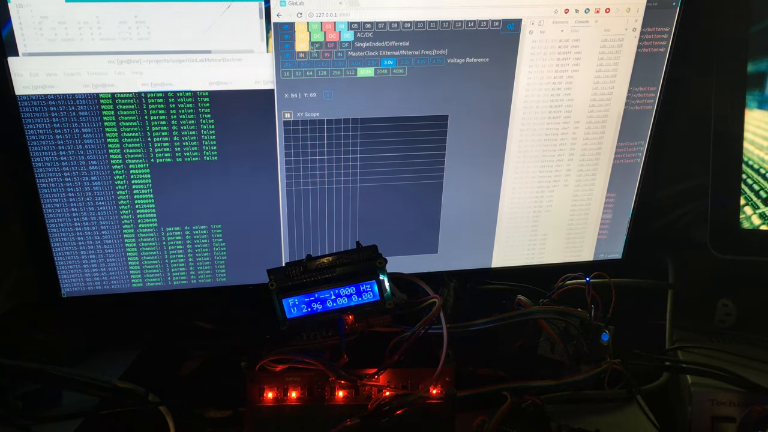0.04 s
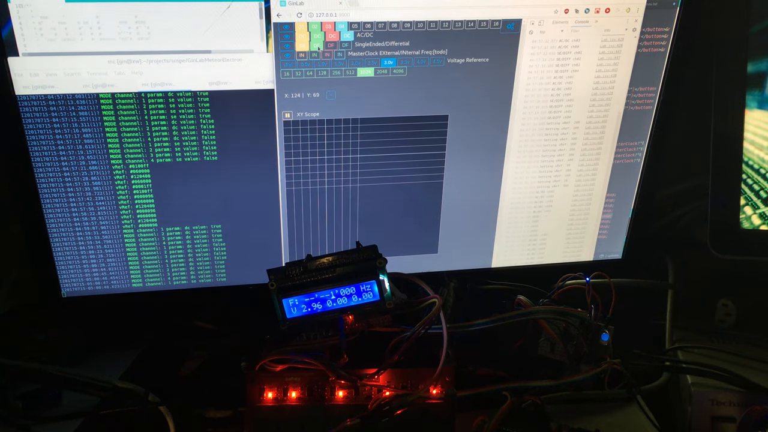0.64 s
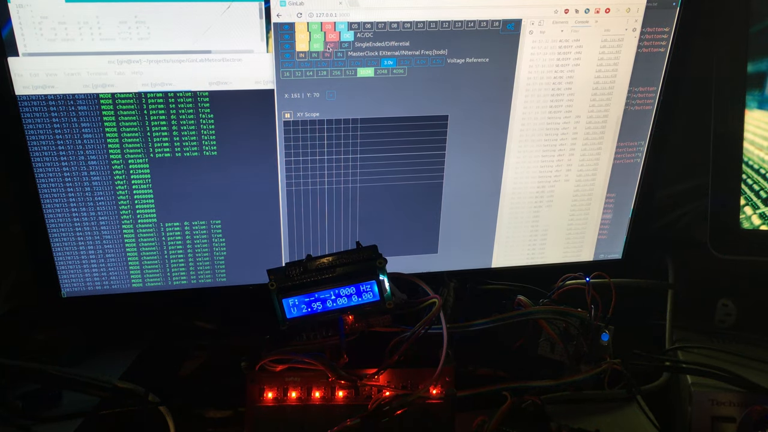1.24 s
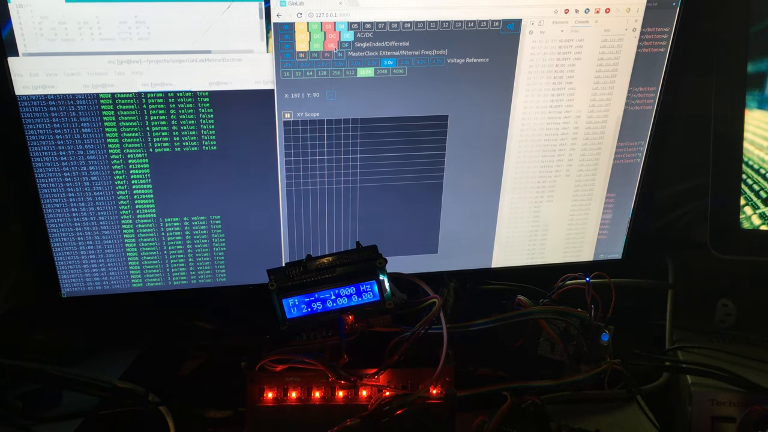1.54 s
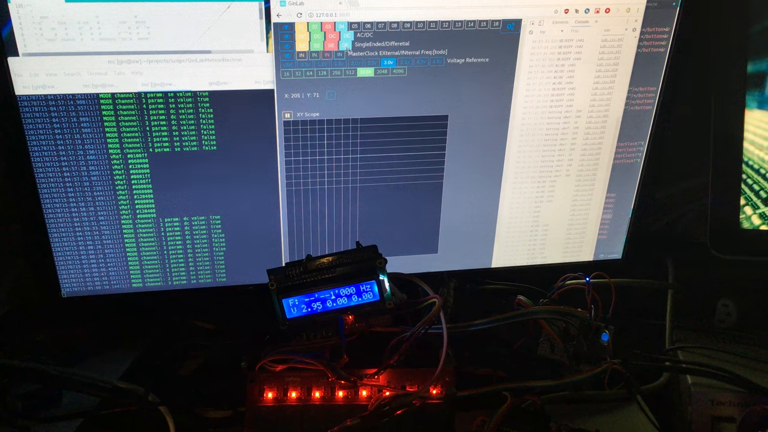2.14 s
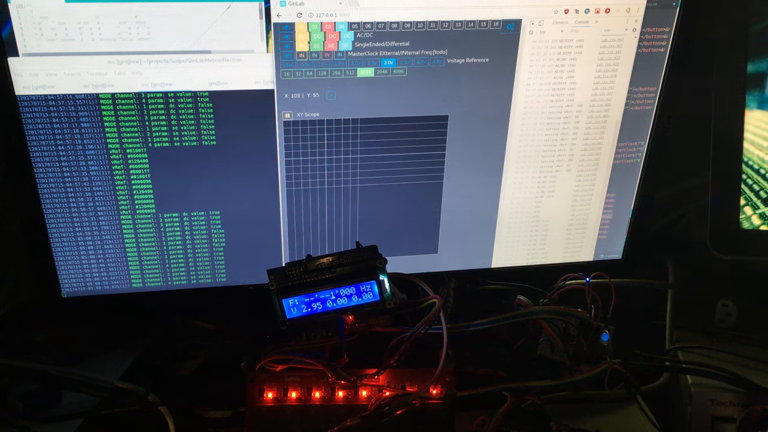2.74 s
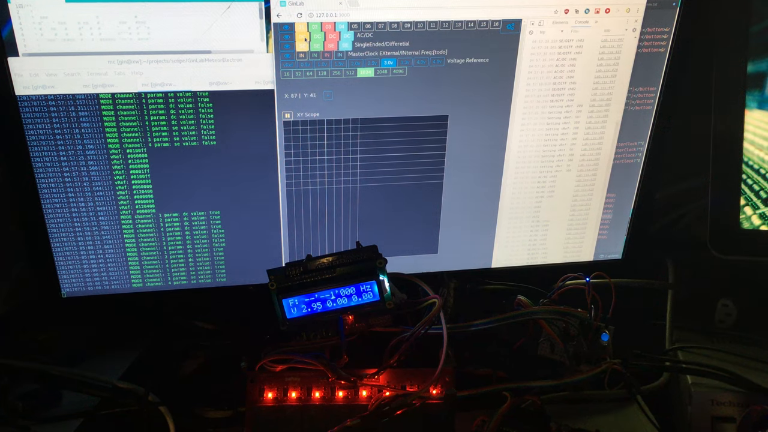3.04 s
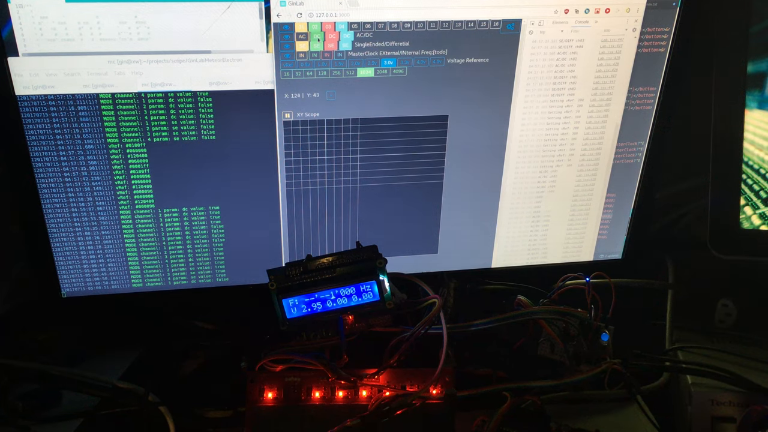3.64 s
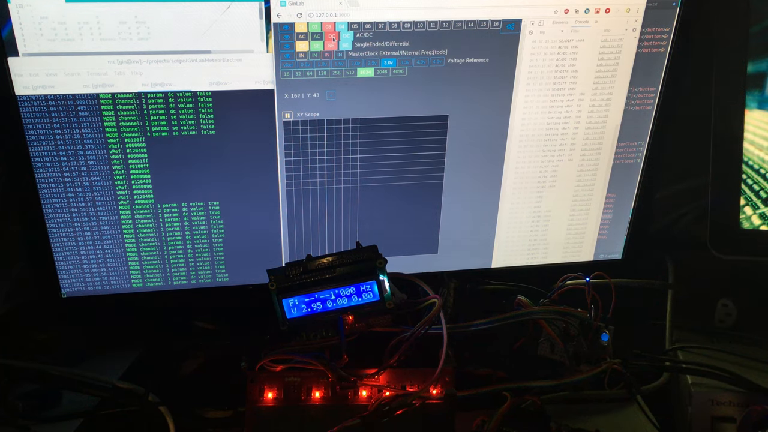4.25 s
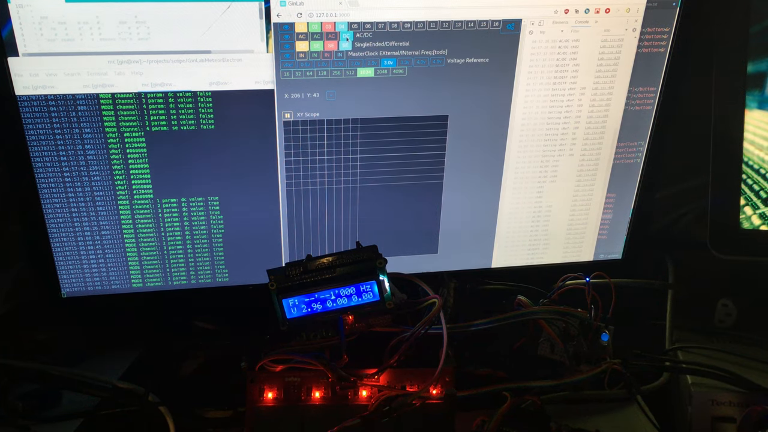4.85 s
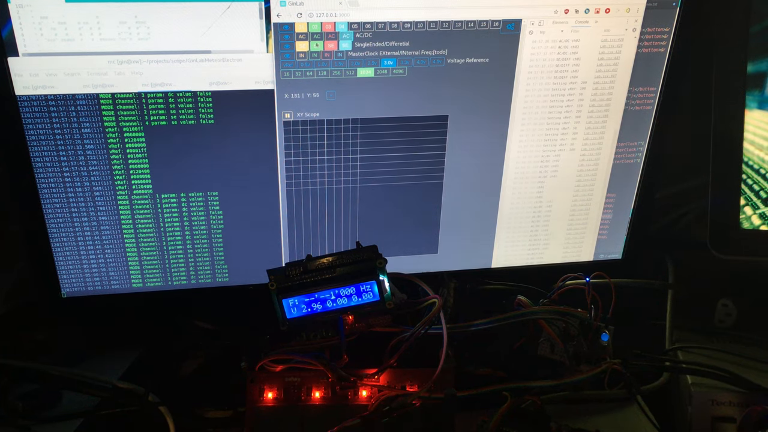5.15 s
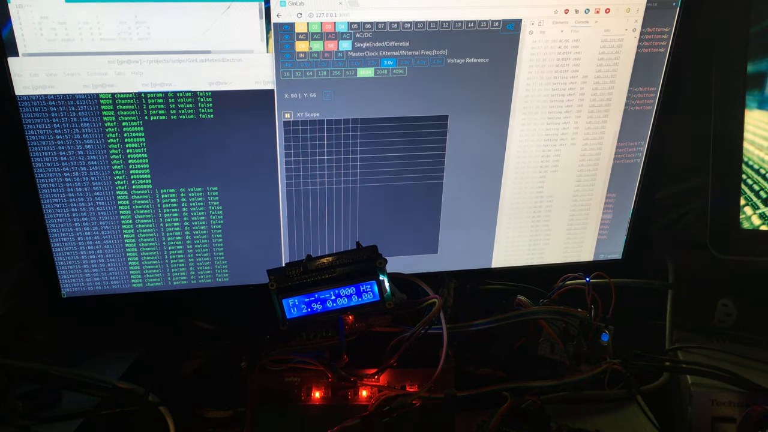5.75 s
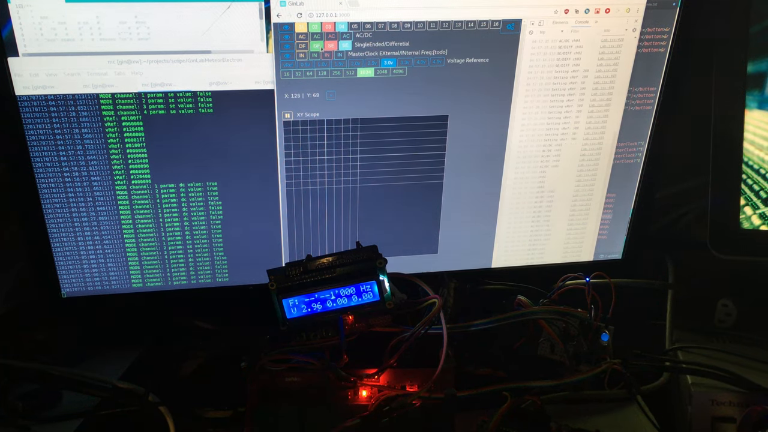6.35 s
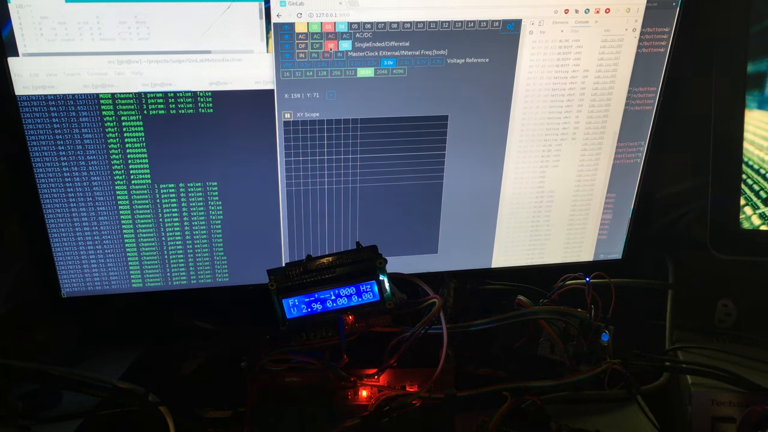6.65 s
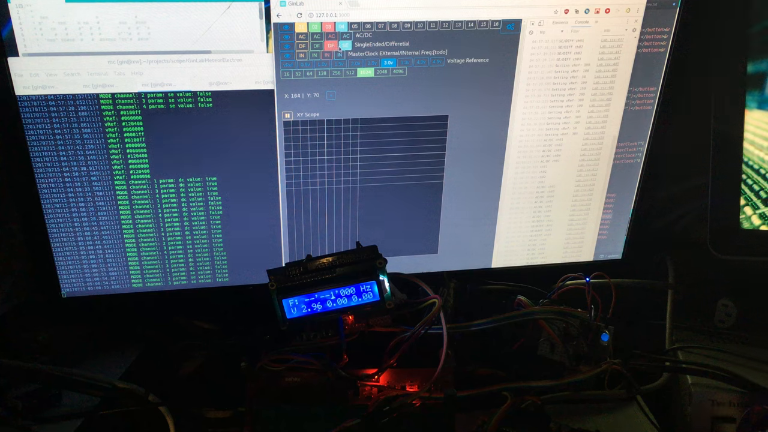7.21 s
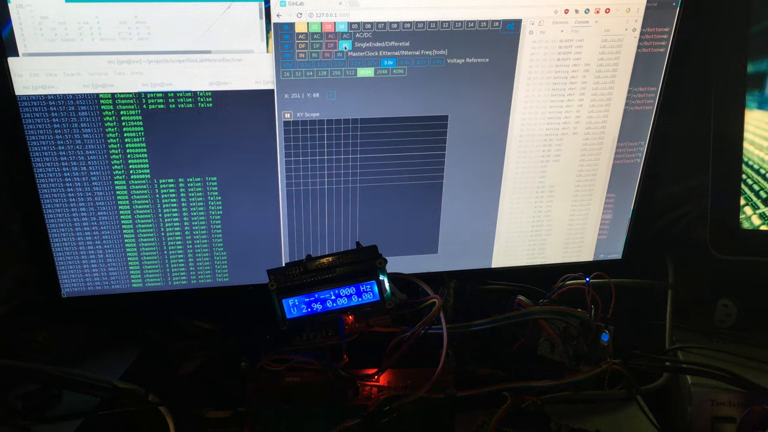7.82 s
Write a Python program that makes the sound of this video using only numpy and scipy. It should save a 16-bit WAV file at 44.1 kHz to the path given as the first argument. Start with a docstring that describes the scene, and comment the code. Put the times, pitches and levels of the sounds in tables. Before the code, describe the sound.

A soft, steady rush of cooling fans with a low electrical hum fills a small room for the whole eight seconds. Right at the start, a relay snaps sharply close to the microphone. Then the relay board steps through its channels in quick clusters: two light, high ticks followed at once by a louder snap. The snaps land at about 0.8, 1.5, 2.2, 3.3, 3.9, 4.5, 5.0, 5.8, 6.3 and 7.0 seconds. The first three, counting the opening one, are the loudest, peaking at 1.5 seconds; the later ones are softer, with a little more knock from the board. Each is very short and bright, a plastic crack with a tiny metallic ring, slightly different in tone and trailed by a brief room echo. At about 7.8 seconds one light tick sounds alone over the fans.

```python
"""A relay board on an electronics bench in a small room, with a phone microphone close by.
Cooling fans and mains hum run from the start, and one relay of the bank snaps at once.
Then the board steps through its channels: two control relays tick, and the next relay of the bank snaps.
Each armature lands and bounces, ringing its spring and frame, cracking the case and knocking the board.
At the end the first control relay ticks alone over the fans."""
import sys
import numpy as np
from scipy import signal
from scipy.fft import irfft
from scipy.io import wavfile

SR = 44100
rng = np.random.default_rng(int(sys.argv[2]) if len(sys.argv) > 2 else 0)


def materialize(psi):
    """Save the field psi as 16-bit PCM at rate SR to the path in sys.argv[1].

    A 1-D psi becomes a single channel; in a 2-D psi each row is a channel.
    """
    bounded = np.clip(np.atleast_2d(psi).T, -1, 1)
    quanta = np.round(bounded * 32767).astype(np.int16)
    wavfile.write(sys.argv[1], SR, quanta)


N = 347508
CLICK_SAMPLES = 2048


def undb(db):
    """Decibels to gain."""
    return 10 ** (np.asarray(db) / 20)


def unit(x):
    """Scale to an energy of one."""
    return x / np.sqrt(np.sum(x ** 2))


def noise(points, size, tilt_db=0):
    """Noise of rms one, its spectrum (frequency [Hz], level [dB]) tilted by tilt_db an octave."""
    hz, db = np.transpose(points)
    octave = np.log2(np.maximum(np.fft.rfftfreq(size, 1 / SR), 1))
    tilt = tilt_db * np.maximum(octave - np.log2(hz[0]), 0)
    gain = undb(np.interp(octave, np.log2(hz), db) + tilt)
    return unit(irfft(gain * np.exp(2j * np.pi * rng.random(len(gain))), size)) * np.sqrt(size)


def wander(rate_hz, size=2048):
    """A slow random curve of spread one, turning about rate_hz times a second."""
    hz = np.fft.rfftfreq(size, N / SR / size)
    curve = irfft(np.exp(2j * np.pi * rng.random(len(hz))) / (1 + (hz / rate_hz) ** 2), size)
    return np.interp(np.arange(N) * size / N, np.arange(size), (curve - curve.mean()) / curve.std())


def fans(air_db=-57, hiss_db=-69, hum_db=1, waver_db=1, drift_hz=0.7, flutter_hz=1.46):
    """Wavering blade and mains tones in a steady rush of air."""
    # fan blades, motors and mains: (frequency [Hz], relative level [dB])
    hum_tones = [(102.3, -69), (150.7, -69.5), (199.2, -70.5), (355.3, -61.5), (403.7, -79), (554.5, -73),
                 (904.4, -89.5), (995.9, -77), (1061, -73.5), (1104, -71), (1130, -78), (1217, -85.5),
                 (1416, -70), (1771, -94), (1836, -83.5), (1986, -81.5), (2277, -84.5), (2982, -100)]
    # air rushing through the fans: (frequency [Hz], relative level [dB])
    air_spectrum = [(25, -16.5), (52, -3), (125, 1.5), (230, -1.5), (320, -1), (430, -3.5), (550, -1),
                    (820, -9), (1050, -5.5), (1220, -9), (1420, -7), (2100, -18.5), (3500, -21.5),
                    (5000, -34)]
    # the fine hiss above it: (frequency [Hz], relative level [dB])
    hiss_spectrum = [(3000, 0.5), (5000, -6), (5900, -1.5), (7800, -6), (8500, -2.5), (10500, -3.5),
                     (10900, 1), (15650, 0), (15850, -38.5)]
    # hum and air are a little louder at first: (time [s], gain [dB])
    level_curve = [(0, -0.5), (.25, 0.5), (.32, -2), (7.88, -2)]
    hum = 0
    for hz, db in hum_tones:
        # the pitch drifts slowly and turbulence shakes it a little
        pitch_hz = hz + drift_hz * wander(1.0) + flutter_hz * wander(9.6)
        cycles = np.cumsum(pitch_hz) / SR + rng.random()
        hum += undb(hum_db + db + waver_db * wander(4)) * np.sqrt(2) * np.sin(2 * np.pi * cycles)
    air = undb(air_db + 0.17 * wander(5.5)) * noise(air_spectrum, N)
    hiss = undb(hiss_db) * noise(hiss_spectrum, N)
    gain = undb(np.interp(np.arange(N) / SR, *np.transpose(level_curve)))
    return (hum + air) * gain + hiss


def bounce_envelope(bounces, width_hz, rise_ms=0.49):
    """Every contact tops up a resonance's energy; the wider the resonance, the faster it leaks away."""
    t = np.arange(CLICK_SAMPLES) / SR
    energy = 0
    for ms, db in [(0, 0), *bounces]:
        age = np.maximum(t - ms / 1000, 0)
        rise = 1 - np.exp(-age * 1000 / rise_ms)
        energy += (undb(db) * rise * np.exp(-np.pi * width_hz * age)) ** 2
    return np.sqrt(energy)


def ring(modes, bounces, damping):
    """Struck modes share an energy of one by height and width; damping multiplies their decay rates."""
    t = np.arange(CLICK_SAMPLES) / SR
    sound = 0
    for hz, width, db in modes:
        tone = np.sin(2 * np.pi * (hz * t + rng.random()))
        sound += undb(db) * np.sqrt(width) * unit(bounce_envelope(bounces, damping * width) * tone)
    return unit(sound)


def click(modes, side_modes, bounces, crack_db, tilt_db, knock_db, room_db, damping=1.55,
          side_crack_db=-7, side_tilt_db=1):
    """An armature lands and bounces: spring and frame ring, the case cracks, the board knocks."""
    # the crowded short modes of the plastic case: (frequency [Hz], relative level [dB])
    case_spectrum = [(700, -43), (1400, -23.5), (2300, -16), (3100, -15), (3900, -5.5), (4700, -10.5),
                     (6500, -1), (9000, 0), (11500, 1), (13500, 4), (15600, -5), (16100, -9)]
    # the circuit board under it: (frequency [Hz], relative level [dB])
    board_spectrum = [(350, -24), (650, 11.5), (850, 8.5), (1600, -1.5), (2400, 2), (3100, -10),
                      (4500, -17.5)]
    case_envelope = bounce_envelope(bounces, width_hz=290)
    board_envelope = bounce_envelope(bounces, width_hz=90)
    knock = undb(knock_db) * unit(board_envelope * noise(board_spectrum, CLICK_SAMPLES))

    def crack(db, tilt):
        return undb(db) * unit(case_envelope * noise(case_spectrum, CLICK_SAMPLES, tilt))

    direct = ring(modes, bounces, damping) + crack(crack_db, tilt_db) + knock
    sideways = ring(side_modes, [], damping=1) + crack(side_crack_db, side_tilt_db) + knock
    # two rows: straight to the microphone (the energy of 10 ms at rms one), and out into the room
    return np.array([unit(direct), undb(room_db) * unit(sideways)]) * np.sqrt(SR / 100)


def add(track, start_s, sound):
    """Mix a sound into the track at a time."""
    i = max(int(start_s * SR), 0)
    track[:, i:i + sound.shape[1]] += sound[:, :N - i]


def radiated(modes, panel_hz, panel_width_hz, panel_db=-2, blur_hz=520, contrast=0.94):
    """A relay's resonances as the room gets them: its modes blurred and evened out, and its side panel."""
    # how strongly the modes radiate sideways: (frequency [Hz], gain [dB])
    radiation = [(2500, -6), (4300, -2), (5800, 0), (7500, -3.5), (9300, -3), (11200, -5.5), (13000, 1),
                 (15000, 1.5)]
    hz, width, db = np.transpose(modes)
    curve_hz, curve_db = np.transpose(radiation)
    height = contrast * (db - db.max()) + np.interp(np.log(hz), np.log(curve_hz), curve_db)
    return [*zip(hz, width + blur_hz, height), (panel_hz, panel_width_hz, panel_db)]


def bank_relays():
    """The louder relays snap one after another, each with its own modes and bounce."""
    # one row a relay: (time [s], level [dB], crack against ring [dB], crack tilt [dB/octave],
    # board knock [dB], room send [dB], side panel [Hz], panel width [Hz],
    # second contact [ms], its strength [dB], third contact [ms], its strength [dB])
    snaps = [(0.0214, -26, 0, 5, -29, -13.5, 10000, 1300, 1.06, 6, 2.5, -16),
             (.8430, -27, -9.5, -3, -35, -15, 11300, 1800, 4, 19, 5.8, 8),
             (1.5435, -23.5, -4, 0, -31.5, -15, 9800, 1400, 1.6, -1, 3.3, -15),
             (2.2317, -36, -8, -4, -23, -12, 11630, 900, 1.4, -1, 2.9, -12),
             (3.2579, -31.5, -9, -1, -18.5, -14.5, 5880, 500, 2.5, 7, 4.1, 4),
             (3.8675, -35.5, -3, 2, -17.5, -14.5, 5800, 500, 3.33, 8, 6.5, -2),
             (4.462, -34.5, -3.5, -1, -17, -13.5, 9500, 730, 2.8, -0.5, 5, -12),
             (5.0051, -38, -4, 0, -17, -11.5, 10840, 650, 2.7, 4, 4.8, -5),
             (5.7652, -33, -2.5, 0.5, -19, -13, 9070, 260, 2, 1, 6.7, -3),
             (6.3251, -33, -6.5, -1, -20.5, -15.5, 9540, 150, 1.5, 3, 5, -1),
             (7.03, -34.5, -6, 0, -19.5, -13.5, 12200, 1300, 2.7, 1, 4.9, -5)]
    # each relay's spring and frame, in the same order: (frequency [Hz], base width [Hz], height [dB])
    bank_modes = [
        [(2510, 160, -19), (4150, 750, -22), (7250, 170, -18), (8540, 1000, -7), (8400, 80, -14),
         (9590, 680, -3), (11200, 180, -19), (12500, 190, -8), (13100, 140, -17), (14400, 170, -14),
         (15100, 180, -10)],
        [(5610, 320, -62), (6670, 95, -11), (7820, 200, -9.5), (8740, 82, 1), (9530, 350, -5.5),
         (10740, 270, 0), (11300, 140, -14), (11700, 210, -9), (13500, 160, -15), (14400, 420, -10),
         (15300, 230, -7)],
        [(1820, 91, -25.5), (4180, 160, -22.5), (5520, 92, -15), (7080, 230, -5), (7500, 130, -2),
         (8370, 140, -15), (9300, 140, -10), (9480, 110, -7), (11360, 270, 1.5), (13700, 360, -21),
         (14900, 260, -8)],
        [(5960, 140, -22), (6760, 410, -0.5), (8250, 210, -1), (9450, 170, -4), (10700, 260, -5),
         (11600, 220, -5), (12500, 250, -11), (13600, 140, -12), (14600, 380, 4)],
        [(2520, 57, -14), (5010, 95, -3), (5370, 68, -10), (5920, 250, -3.5), (7160, 100, -27), (8140, 89, -4),
         (7960, 280, -6), (9000, 380, 0.5), (10730, 150, 0.5), (11600, 79, -7), (13400, 50, -19),
         (14900, 250, -11)],
        [(4170, 200, -4.5), (5390, 220, -5), (7360, 110, -4), (8800, 120, -10), (9910, 190, -2),
         (10900, 130, -1), (11360, 330, 0), (12500, 150, -10), (13000, 470, -16), (14900, 130, -9),
         (15200, 120, -14)],
        [(4160, 100, -7.5), (5170, 140, -1), (5540, 69, 1), (6740, 180, -4.5), (8450, 89, -4), (9100, 240, -5),
         (10800, 26, -3), (11260, 96, 3), (13400, 64, -9), (13900, 53, -11), (14900, 79, -11), (15600, 43, -16)],
        [(4120, 130, -2), (4600, 110, -6), (5350, 140, -6), (7100, 160, -9), (8770, 160, -1), (9400, 130, 0),
         (11250, 130, 1), (12000, 110, -11), (12400, 110, -12), (14200, 120, -5), (15400, 120, -2)],
        [(4200, 53, -10), (4470, 51, -8), (5230, 44, -11), (5800, 34, -4), (6250, 94, -6.5), (8060, 23, -8),
         (8800, 65, 1), (9670, 70, 4), (11900, 140, -4), (14000, 70, -14), (14900, 91, -14)],
        [(2500, 87, -22), (5340, 110, -12), (6650, 130, -12), (8100, 120, -13), (8450, 130, -19),
         (9400, 230, 2.5), (10740, 200, -12), (12500, 98, -19), (13600, 130, -20), (16000, 120, -15)],
        [(4180, 150, -3), (4980, 120, -9), (8570, 180, -3), (9330, 170, 2), (11100, 91, -8), (11460, 350, 2),
         (12500, 120, -3), (13900, 150, -5), (14500, 150, -7), (14800, 130, -7), (15600, 160, -11)],
    ]
    track = np.zeros((2, N))
    for row, modes in zip(snaps, bank_modes):
        start_s, db, crack_db, tilt_db, knock_db, room_db, panel_hz, panel_width_hz, *contacts = row
        side_modes = radiated(modes, panel_hz, panel_width_hz)
        bounces = np.reshape(contacts, (-1, 2))
        snap = click(modes, side_modes, bounces, crack_db, tilt_db, knock_db, room_db)
        add(track, start_s, undb(db) * snap)
    return track


def control_relays(first_db=-43.5, second_db=-40.1, faint_s=1.405, faint_db=-55):
    """Two small relays tick in turn ahead of the bank; the first sometimes lands harder."""
    # the first relay's landings: (time [s], extra force [dB])
    first_ticks = [(0.7124, 0), (1.4370, 1), (2.1302, 1), (3.118, 0), (3.757, 1), (4.3421, 2.5),
                   (4.8658, 0.5), (5.6330, 1), (6.1873, 2.5), (6.9225, 0.5), (7.808, 0.5)]
    # the second relay's landings: (time [s])
    second_ticks = [0.8034, 1.5077, 2.1974, 3.216, 3.835, 4.424, 4.971, 5.7322, 6.2936, 6.9926]
    # contact chatter: (time after the first touch [ms], strength against it [dB])
    first_bounces = [(2.1, 4), (4.6, -1), (8, -12), (10.2, -10.5)]
    second_bounces = [(1.6, -0.5), (3.5, 4), (5.6, -8), (10, -5)]
    # spring and frame: (frequency [Hz], base width [Hz], height [dB])
    first_modes = [(3350, 75, -15), (5920, 150, -4), (6960, 250, -13), (8360, 110, 2.5), (9900, 160, -11),
                   (10730, 110, -5), (11520, 64, 3), (12680, 84, 6.5), (13020, 100, 11), (13600, 120, -1),
                   (15100, 100, -2)]
    second_modes = [(3320, 55, -11), (8110, 180, 0.5), (9350, 110, -17), (11300, 68, -4.5),
                    (10950, 100, 4.5), (11000, 180, -4), (11700, 90, 4), (13700, 130, 1.5), (13000, 180, 5),
                    (13500, 140, 2), (13900, 140, 0), (15300, 410, -24)]
    # broad resonances sounding sideways into the room: (frequency [Hz], width [Hz], height [dB])
    first_side = [(8500, 370, -13.5), (12700, 310, 1), (14200, 990, -9)]
    second_side = [(8050, 400, -8), (12000, 1500, -2), (13900, 1700, -9.5)]
    track = np.zeros((2, N))
    for start_s, force_db in first_ticks:
        # a harder landing cracks the case louder and lower
        tick = click(first_modes, first_side, first_bounces, crack_db=-9.5 + 1.3 * force_db,
                     tilt_db=3.5 - 0.9 * force_db, knock_db=-23, room_db=-6.5, damping=3.0)
        add(track, start_s, undb(first_db + force_db) * tick)
    for start_s in second_ticks:
        tick = click(second_modes, second_side, second_bounces,
                     crack_db=-3, tilt_db=2, knock_db=-23, room_db=-8.5, damping=1.2)
        add(track, start_s, undb(second_db) * tick)
    faint_tick = click(first_modes, second_side, first_bounces,
                       crack_db=8, tilt_db=-3, knock_db=-27, room_db=-7)
    add(track, faint_s, undb(faint_db) * faint_tick)
    return track


def room(sound, early_db=-4, low_t60=0.28, high_t60=0.22, early_t60=0.081, gap_s=0.0051, split_hz=9000):
    """Quick scatter off desk and screens, then a short tail whose treble dies first."""
    t = np.arange(SR // 2) / SR
    age = np.maximum(t - gap_s, 0)
    low, high, near = rng.standard_normal((3, len(t))) * (age > 0)
    low = signal.sosfilt(signal.butter(2, split_hz, fs=SR, output="sos"), low)
    high = signal.sosfilt(signal.butter(2, split_hz, "high", fs=SR, output="sos"), high)
    fade = np.exp(-np.log(1000) * age)  # 60 dB a second
    tail = low * fade ** (1 / low_t60) + undb(-4.5) * high * fade ** (1 / high_t60)
    early = near ** 3 * fade ** (1 / early_t60)  # a few strong reflections among many weak ones
    return signal.fftconvolve(sound, unit(tail) + undb(early_db) * unit(early))[:N]


def scene():
    """At the bench, in mono: the relays close up, the small room behind them, the fans underneath."""
    direct, sideways = control_relays() + bank_relays()
    return (direct + room(sideways) + fans())[None]


def record(dry):
    """The phone cuts the very top."""
    top_hz = 15950
    return signal.sosfilt(signal.ellip(10, .2, 70, top_hz, fs=SR, output="sos"), dry)


dry = scene()
out = record(dry)
materialize(out)
```